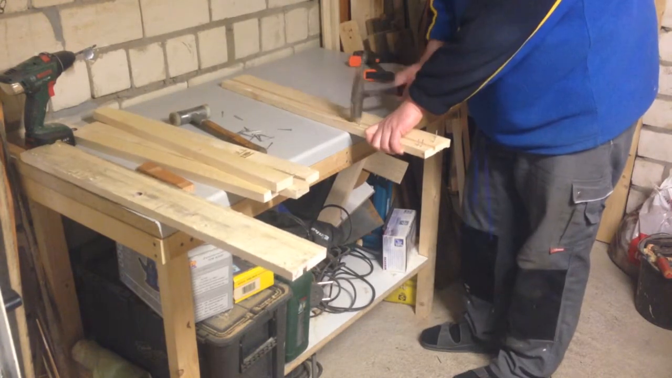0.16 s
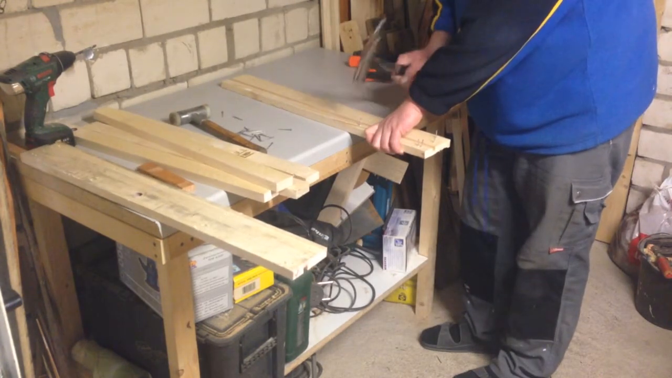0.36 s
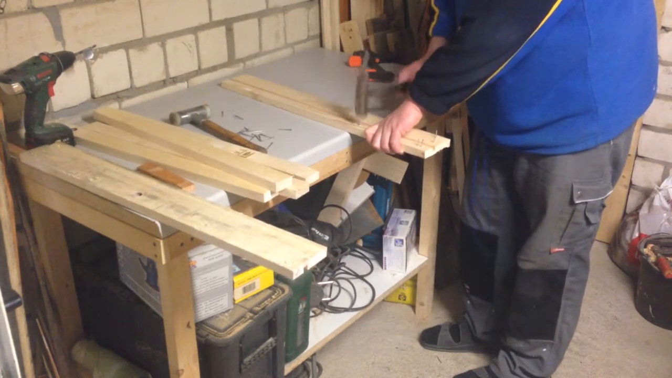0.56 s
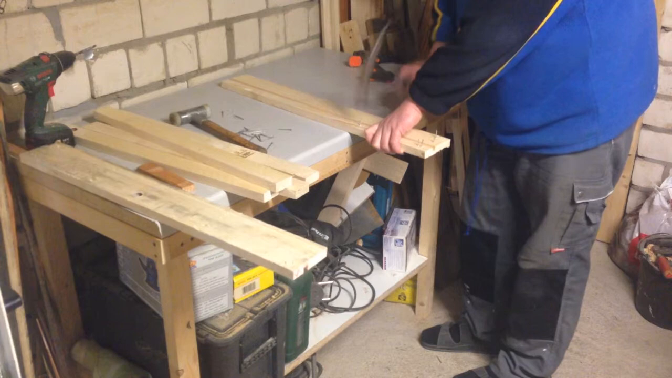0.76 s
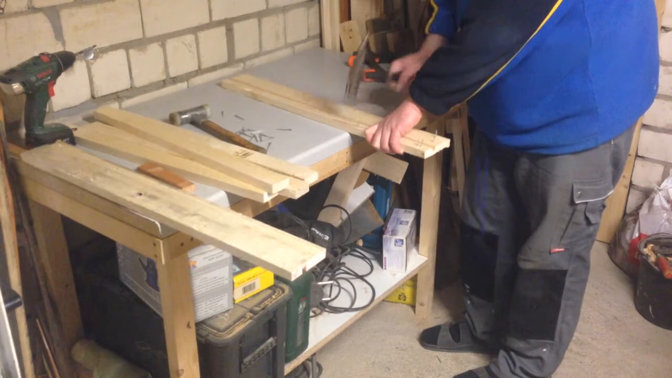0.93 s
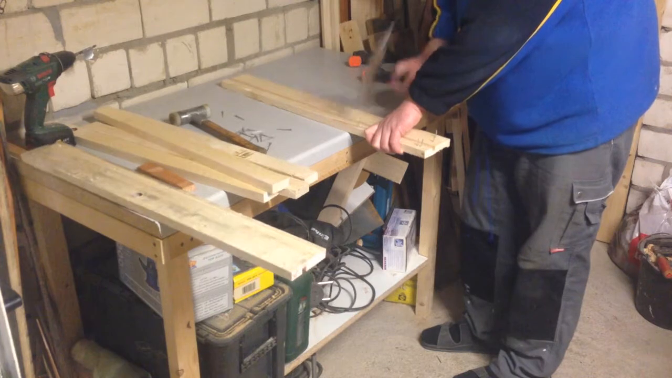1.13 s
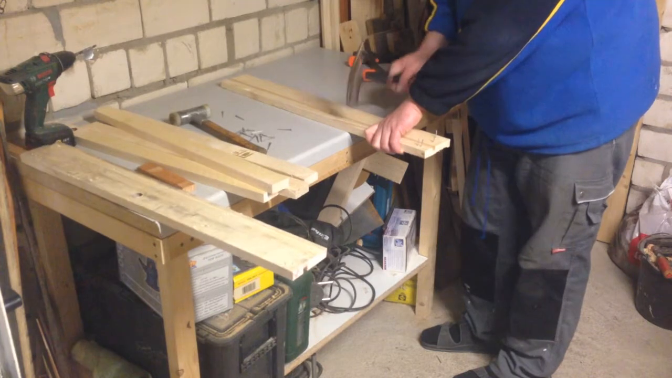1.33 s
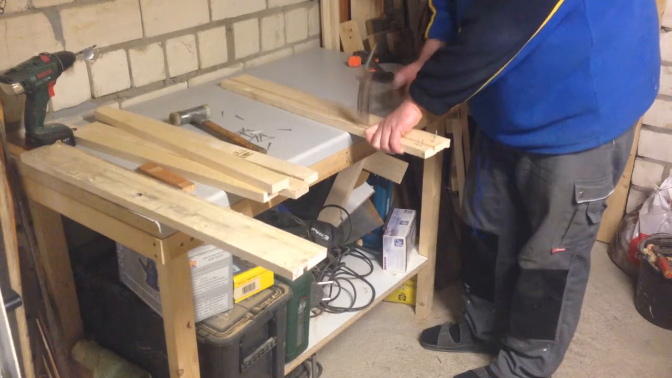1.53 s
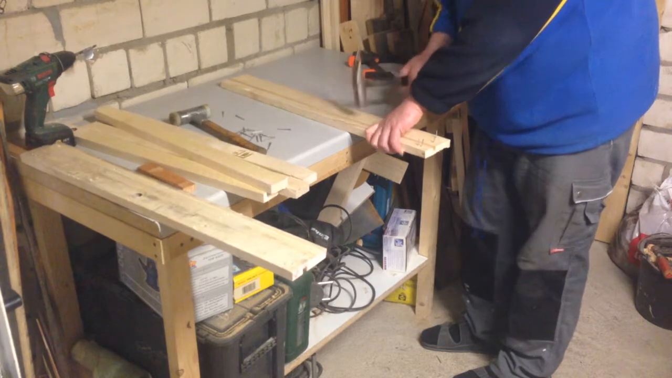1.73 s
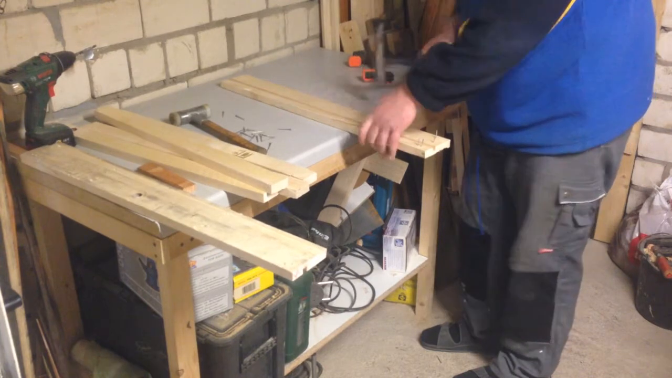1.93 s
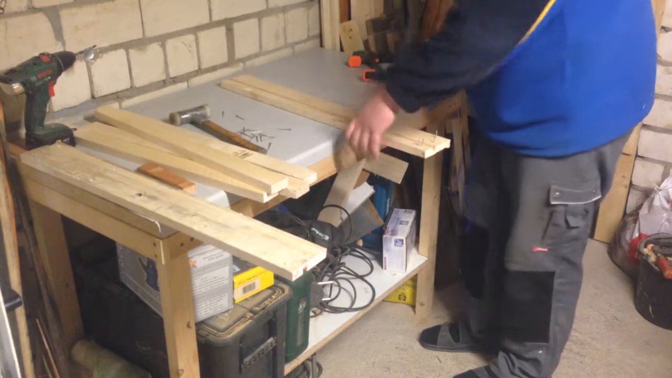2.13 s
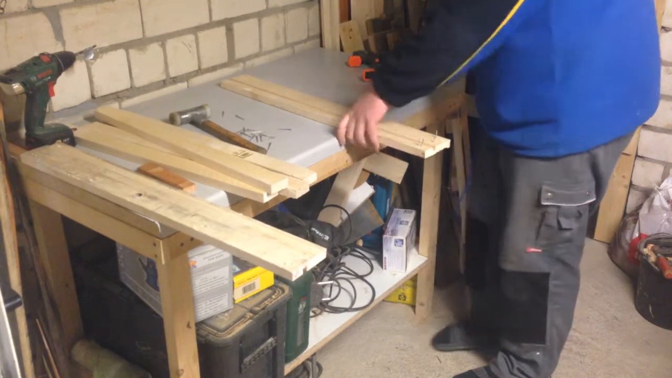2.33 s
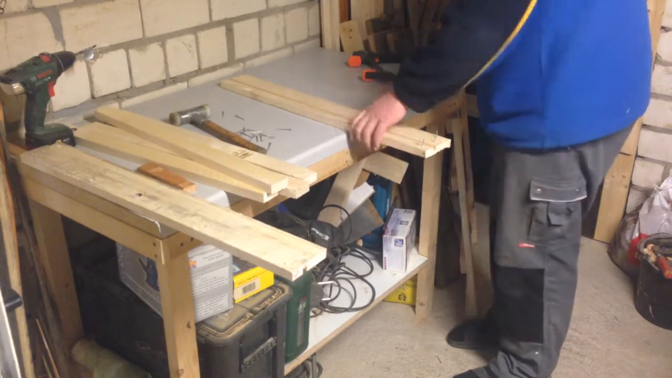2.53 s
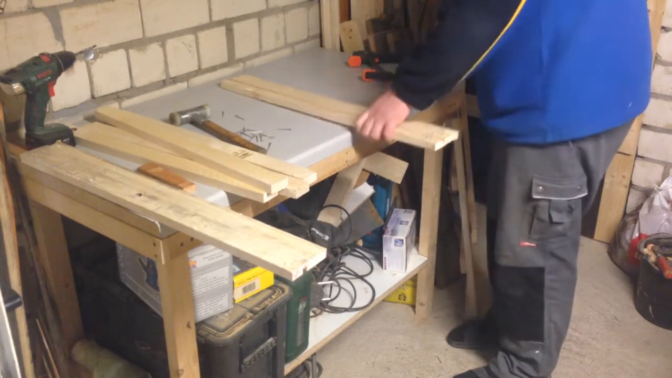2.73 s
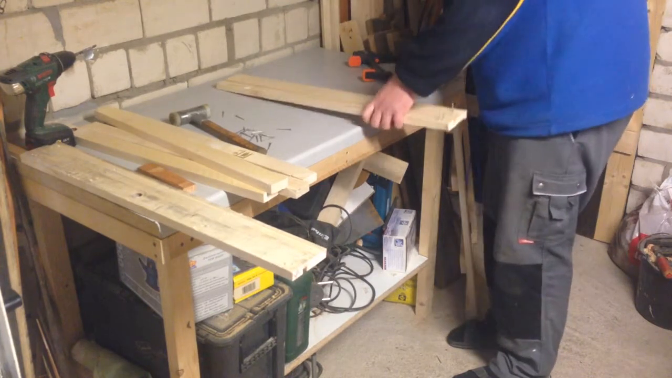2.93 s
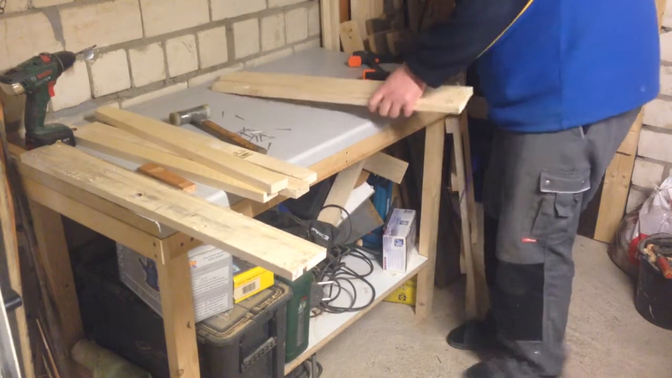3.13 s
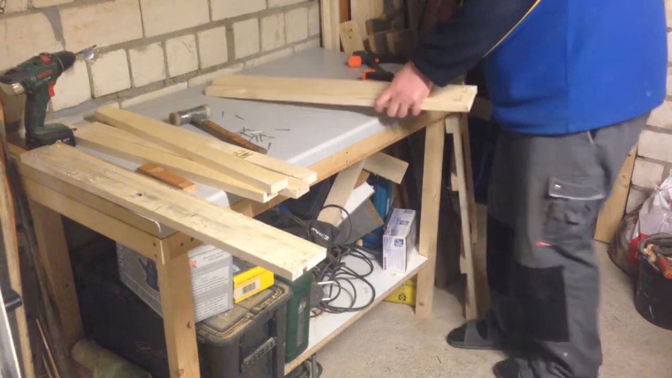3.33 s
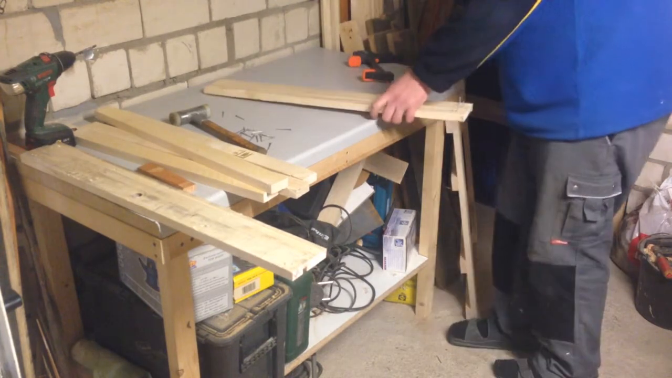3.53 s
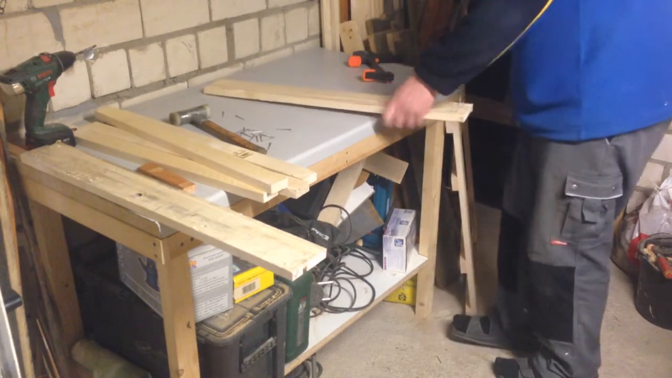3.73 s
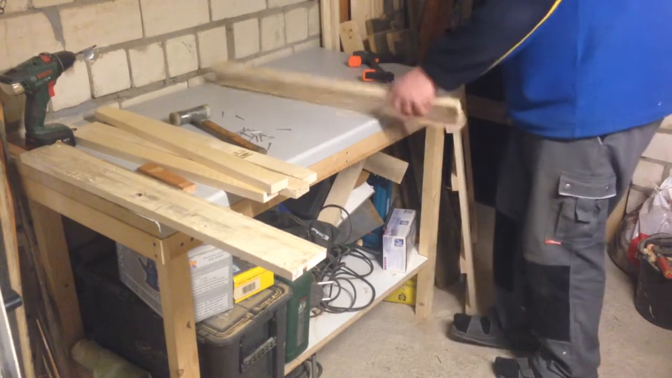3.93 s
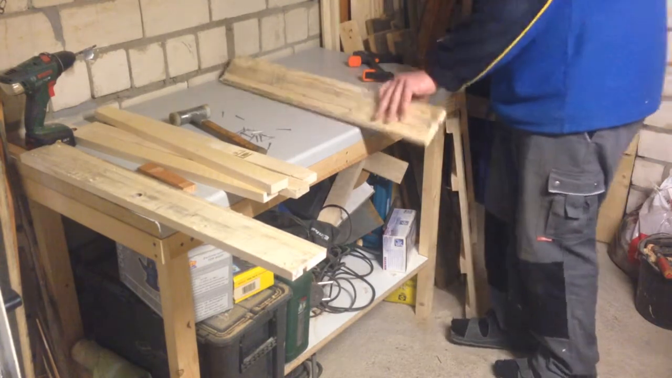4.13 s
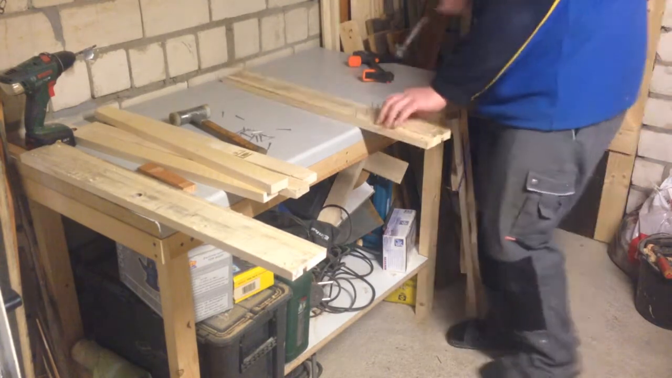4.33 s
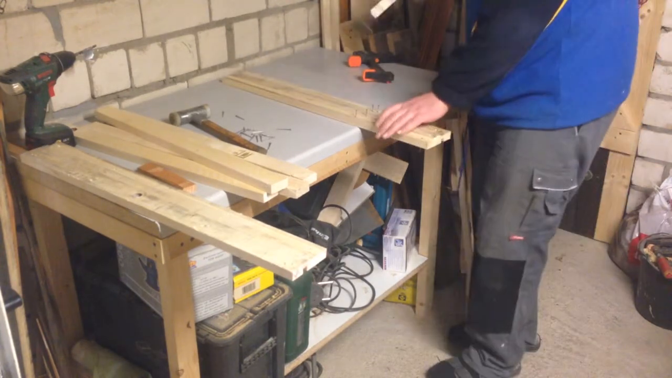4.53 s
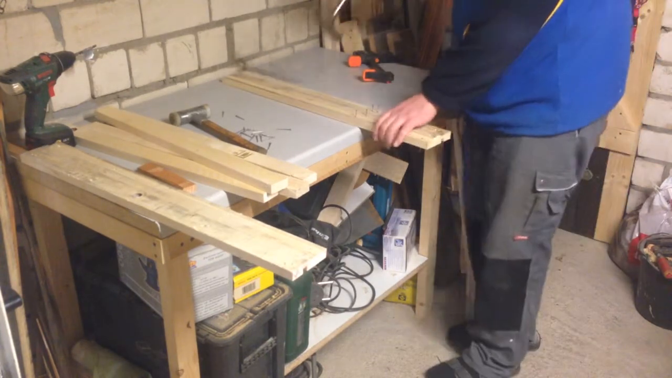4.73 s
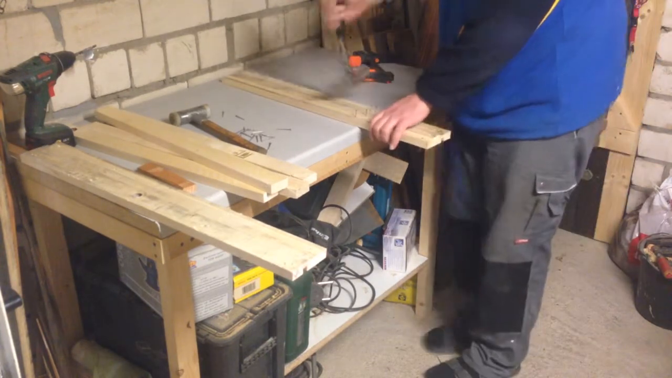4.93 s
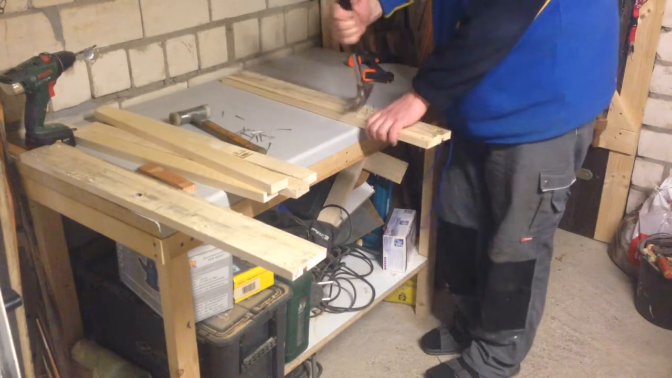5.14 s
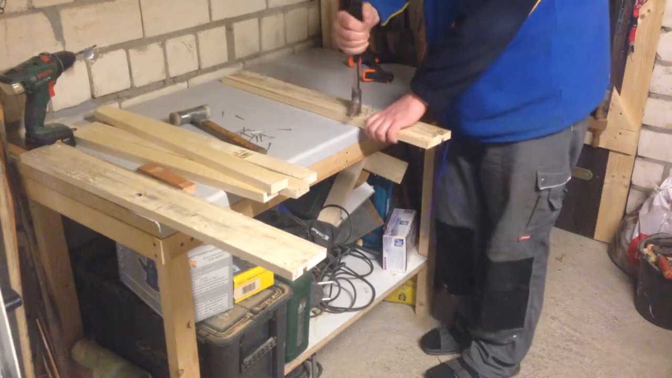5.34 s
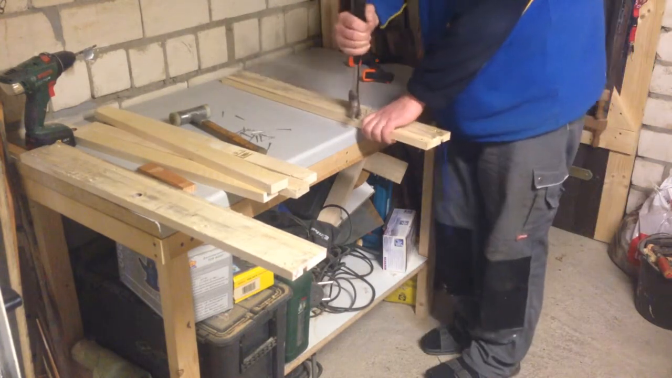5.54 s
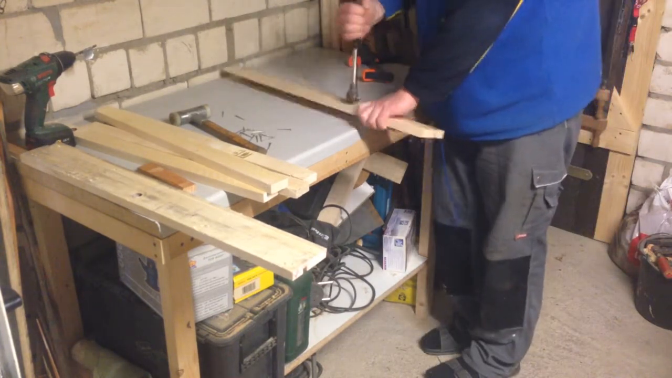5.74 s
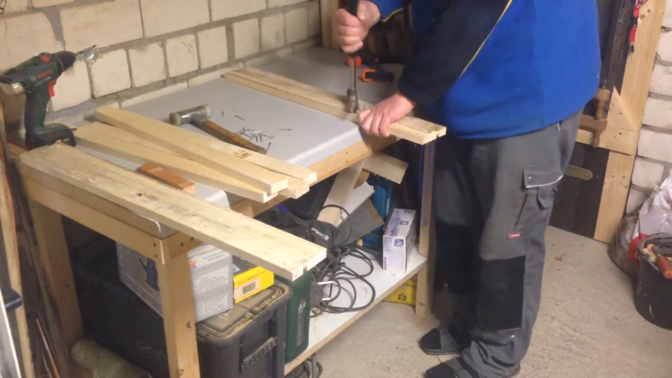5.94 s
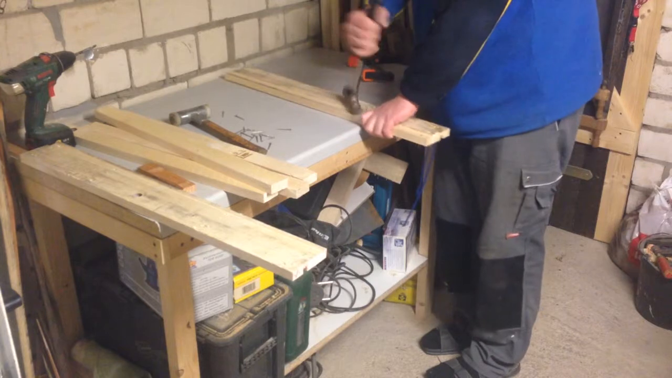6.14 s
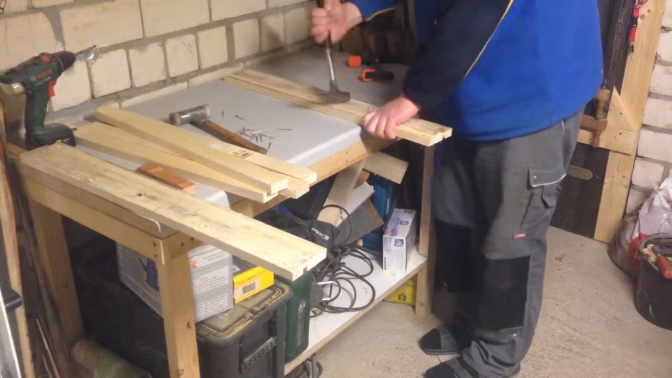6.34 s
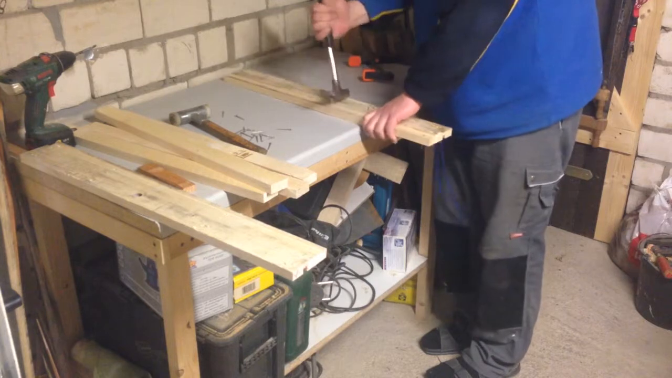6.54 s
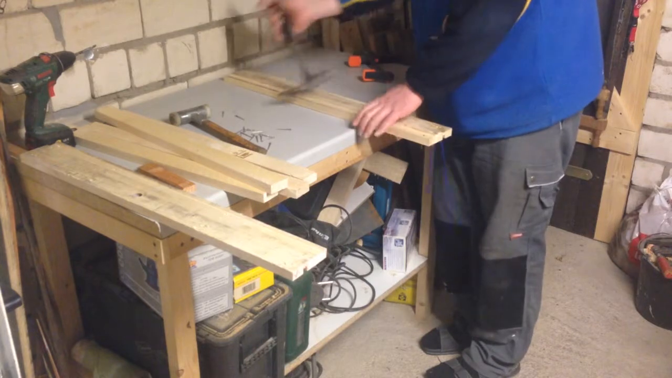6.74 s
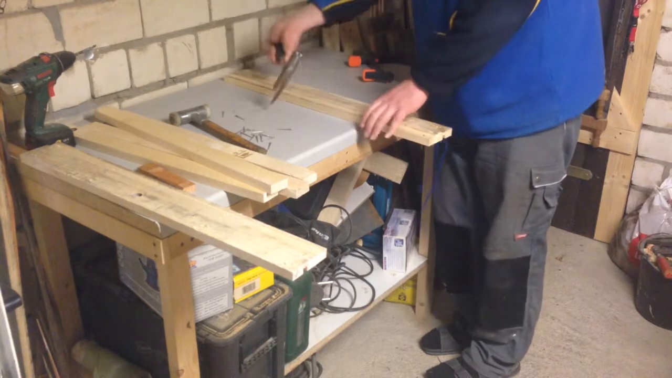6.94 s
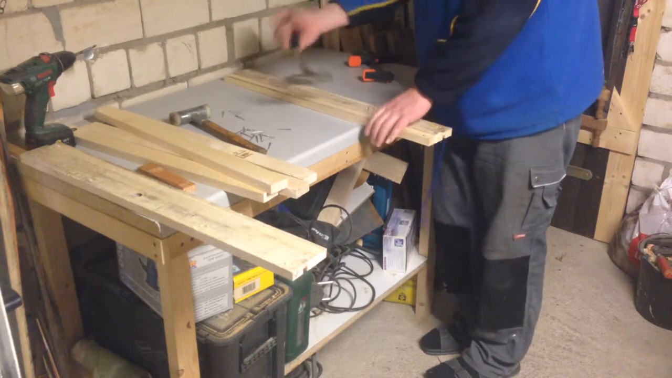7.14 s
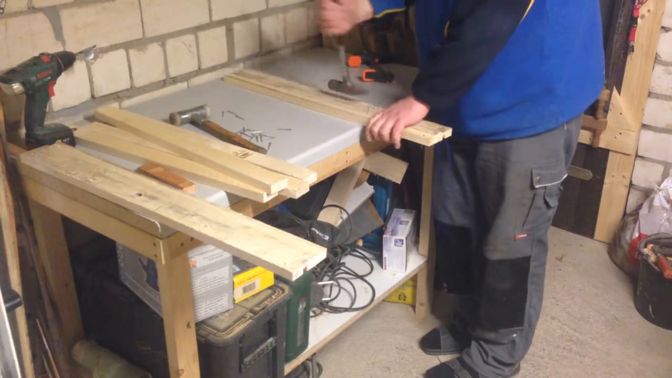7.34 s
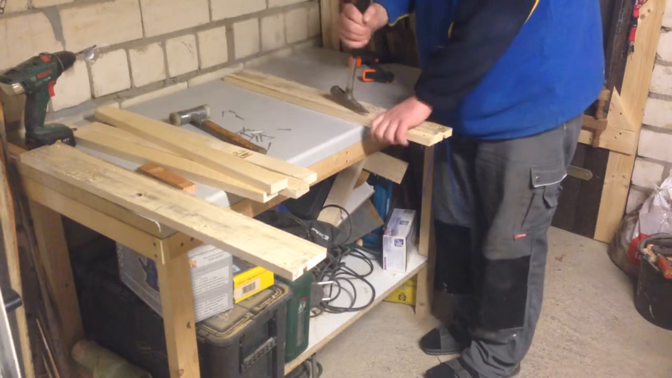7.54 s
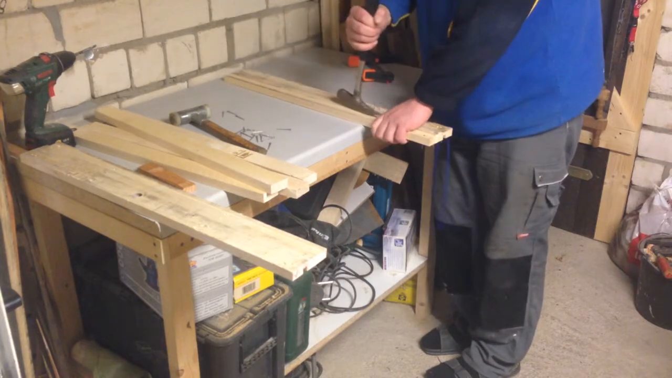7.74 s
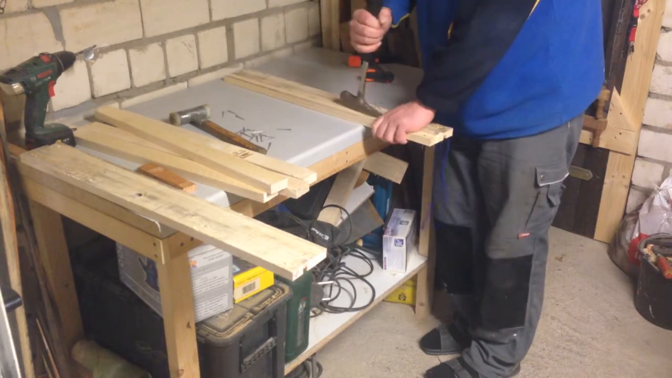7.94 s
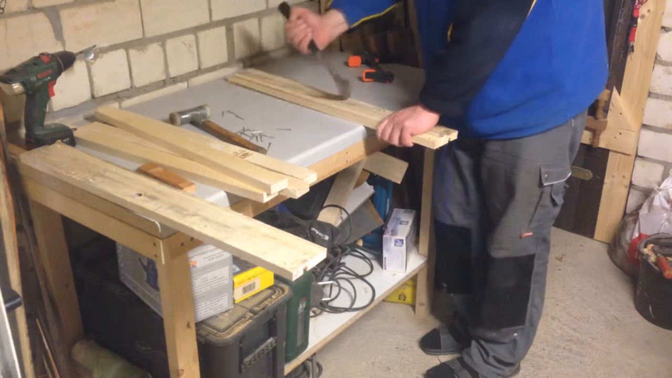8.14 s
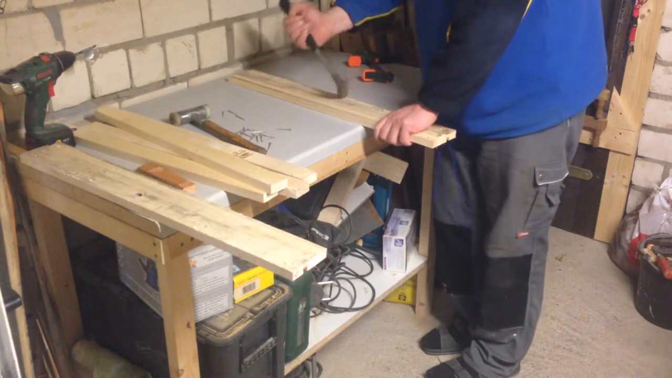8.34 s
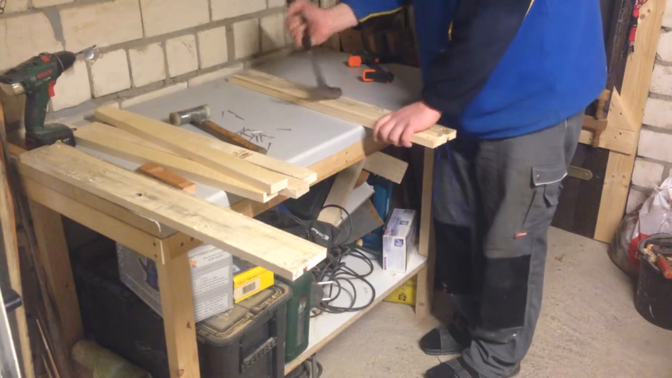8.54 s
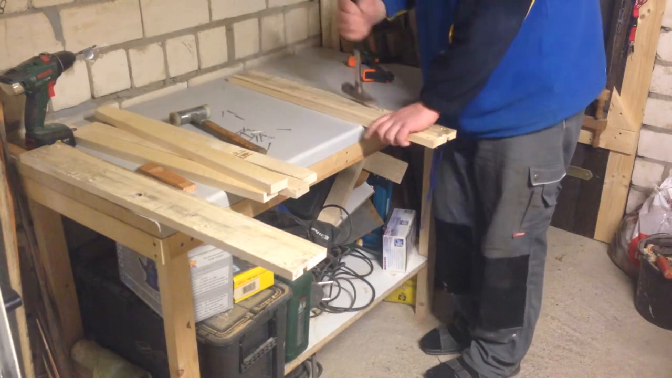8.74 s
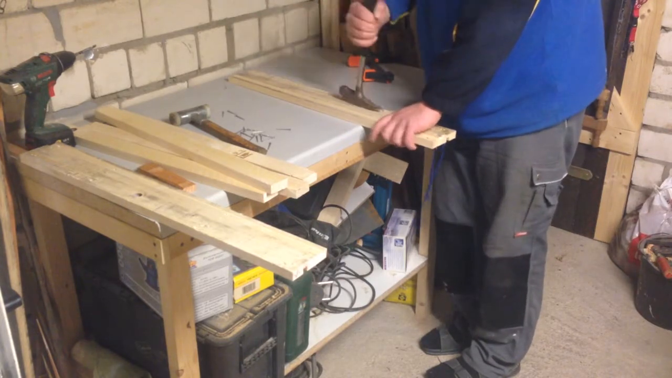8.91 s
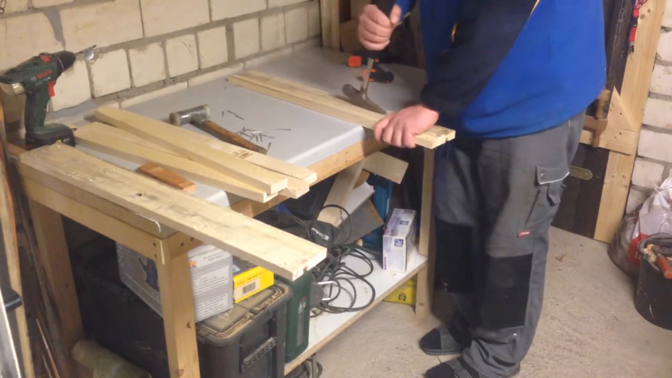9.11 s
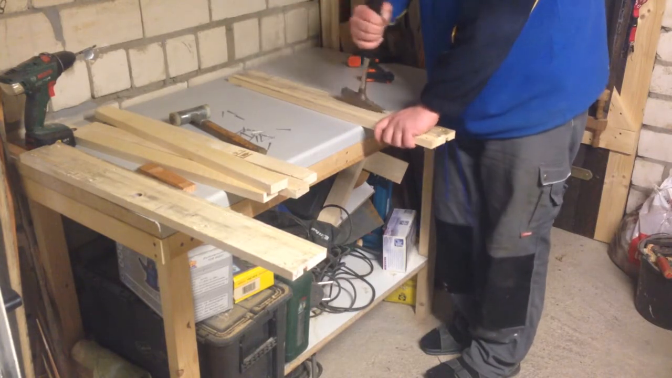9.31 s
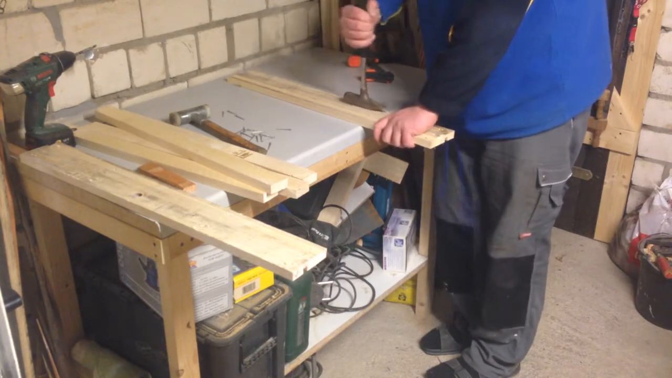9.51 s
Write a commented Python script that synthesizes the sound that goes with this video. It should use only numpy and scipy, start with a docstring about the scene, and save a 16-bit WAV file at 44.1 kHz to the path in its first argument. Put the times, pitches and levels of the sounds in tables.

```python
"""Hammer blows knock nails out of softwood boards on a workbench, each with a slap on the bench and bounces.
Sleeves and shoes then rustle and wood drags; boards are laid, turned and levered, and steel slips and strikes.
Pulled nails skip on the concrete floor, then more boards, steel and nails land before a last rustle and scrape.
Rough noise bursts excite wood modes or nail rings; shaped noise makes cloth, dragging and hiss.
A small brick workshop answers every contact briefly over a faint steady hiss."""
import sys
import numpy as np
from scipy import signal
from scipy.fft import rfft, irfft
from scipy.io import wavfile
from scipy.ndimage import uniform_filter1d

SR = 44100
rng = np.random.default_rng(int(sys.argv[2]) if len(sys.argv) > 2 else 0)


def decibels_to_gain(level_db):
    """Convert a level in decibels to a linear amplitude gain (20 dB per decade)."""
    exponent = np.asarray(level_db, float) / 20
    return 10 ** exponent


def wav_out(sig):
    """Save sig, one row per channel (or a flat mono array), as 16-bit PCM at SR to the path in sys.argv[1]."""
    wavfile.write(sys.argv[1], SR, np.round(np.clip(np.atleast_2d(sig).T, -1, 1) * 32767).astype(np.int16))


N = 422037  # samples in the scene
SPAN = 2 ** 15  # samples of one contact with its tail
LEAD = SR // 32  # samples of swell ahead of a contact
HZ = np.fft.rfftfreq(SPAN, 1 / SR)
T = np.arange(SPAN) / SR

# In the contact tables thud, body, edge and crack are tone settings from low to high; levels are before the mix.
# hammer blows on the nails: start_s, level_db, crack_db, ring_hz (loudest), slap_drop_db (below the blow)
HAMMER_BLOWS = [(-.13, -8.5, -16, 1520, 8.5), (.227, -3, -13.5, 2370, 3.5), (.658, -3.5, -18, 2400, 16.5),
                (.941, -0.7, -18.5, 1370, 3.5), (1.327, -3.5, -19, 2440, 4.5), (1.695, -3, -22, 500, 6)]
# tone of a blow: thud_db (bench), body_db (board), edge_db, chatter_s
BLOW_TONE = (-16, -12, -13.5, 0.1822)
# tone of the struck board slapping the bench: thud_db, body_db, edge_db, chatter_s
SLAP_TONE = (-13.5, -6, -17.5, 0.198)
# the board bouncing after a blow: start_s, level_db, body_db, crack_db, ring_hz
BOARD_BOUNCES = [(-.03, -10, -7.5, -34.5, 1470), (.323, -9, -18.5, -33.5, 1490),
                 (.367, -17.5, -14, -37.5, 1465), (0.435, -27, -7.5, -26, 2150),
                 (.509, -35, -1, -33.5, 2111), (.744, -20, -4.5, -27.5, 1536),
                 (0.815, -32, -7, -32.5, 1440), (1.031, -8.5, -6.5, -30, 2090),
                 (1.084, -20.5, -19, -25.5, 1470), (1.169, -30, -4.5, -25.5, 1470),
                 (1.409, -13.5, -7.5, -37, 1490), (1.485, -28, -14.5, -41.5, 2090),
                 (1.529, -28.5, -11, -32, 2220), (1.749, -13.5, -7, -24, 1295),
                 (1.789, -16.5, -11.5, -22, 1380), (1.859, -32, -9, -22, 704)]
# boards laid, turned and levered on the bench: start_s, level_db, thud_db, crack_db, ring_hz, chatter_s
BOARD_KNOCKS = [(3.6, -33.5, 0, -27.5, 940, .21), (3.623, -21, -8, -33, 870, .27),
                (3.79, -29, -4.5, -40.5, 1113, .29), (4.013, -28.5, -19, -18, 1150, .15),
                (4.022, -22, -24.5, -39, 1450, .05), (4.137, -22.5, 1.5, -46.5, 985, .08),
                (4.31, -11, -13.5, -44.5, 998, .28), (4.342, -10.5, -20.5, -43.5, 923, .15),
                (4.369, -21, -12.5, -40.5, 923, .05), (4.497, -5, -13, -36.5, 1440, .08),
                (5.435, -25, 0.7, -37.5, 533, .15), (5.46, -28, -7.5, -33.5, 1495, .15),
                (5.586, -26.5, -15.5, -27, 770, .15), (6.019, -42.5, -2, -24.5, 739, .18),
                (7.684, -31, 2.5, -30, 713, .09), (7.709, -26.5, -8, -40, 1460, .15),
                (8.333, -5, -10, -30.5, 850, .15), (8.599, -22, -7, -26, 724, .15),
                (8.954, -10, -11, -31, 1200, .17), (9.196, -46, -1, -19, 739, .14)]
# steel head and claw catching, slipping and striking: start_s, level_db, thud_db, crack_db, ring_hz, edge_db
STEEL_HITS = [(2.687, -54.5, 1, -6, 899, -4), (2.809, -50, -16, -18, 1455, -11),
              (5.545, -36, -8.5, -29.5, 3300, -5), (5.818, -5, -11.5, -24.5, 2700, -6),
              (6.325, -1.4, -10, -19, 2202, -12.5), (6.569, -45, -10, -12, 1490, -12),
              (7.797, -35.5, -11, -20, 4600, -16.5), (7.938, -36.5, -1.5, -31, 3470, -9),
              (8.237, -8.5, -7, -11, 1487, -13), (8.523, -21.5, -40, -32.5, 2690, -9.5),
              (9.469, -43, -5.5, -17, 3900, -4), (9.553, -29.5, -2.5, -11.5, 803.6, -10)]
# brightness of a hard face, added to every contact on wood: pitch_hz, gain_db
HARD_FACE = [(1900, -1), (3200, 10), (7000, 11.5)]
# modes of bench top and boards before damping: pitch_hz, width_hz, level_db (over the dense background)
WOOD_MODES = [(86, 4.6, 13.5), (132, 15, 8), (175.84, 12, 17), (280, 8.3, 10), (400, 55, 4.5),
              (523, 21, 7.5), (647, 82, 5.5), (802, 34, 6), (908, 6.7, 3.5), (1090, 25, -8), (1481, 57, 6),
              (1785, 8.3, -16), (1870, 8.5, -5.5), (2175, 160, 5), (2450, 49, 5), (2736, 67, 3),
              (3210, 35, 1.5), (4440, 150, 3), (5350, 110, 4.5)]
# dense background of wood modes: pitch_hz, gain_db
PLANK_TONE = [(30, -9), (60, 7.5), (250, 5), (1000, -4.5), (2500, -11), (4000, -10.5), (8000, -17.5),
              (15000, -30)]
# nails hitting the floor: start_s, level_db, ring_hz
NAIL_HITS = [(6.999, -52.5, 9310), (7.063, -24, 4950), (7.0938, -30.5, 3440), (7.1425, -32.5, 5420),
             (7.196, -41.5, 2110), (7.2261, -29.5, 2340), (7.2778, -36, 6100), (7.32, -41.5, 2090),
             (7.3524, -45, 2280), (7.3744, -51.5, 2260), (8.5844, -18, 5340), (8.6292, -49, 2090),
             (8.6886, -25, 2100), (8.772, -32, 5000), (8.8095, -40.5, 4900)]
# click of a nail on concrete: pitch_hz, gain_db
NAIL_CLICK = [(290, -84), (500, -21.5), (1600, -6.5), (2010, -8.5), (2230, -4.5), (2800, -9), (3480, -4),
              (15500, -19.5)]
# brushes of sleeves, shoes and hands: peak_s, level_db, rise_ms (per 20 dB), fall_ms (per 20 dB)
RUSTLES = [(2.422, -58.5, 18, 57), (2.53, -70, 150, 100), (2.612, -53, 110, 58), (2.694, -66, 21, 50),
           (2.82, -58, 15, 120), (3.048, -64.5, 150, 150), (3.29, -64, 200, 300), (3.425, -52.5, 18, 99.5),
           (3.58, -67.5, 200, 30), (4.63, -54, 25, 140), (4.675, -52.5, 101, 68), (4.95, -67.5, 599.5, 600),
           (5.048, -52.5, 6, 45), (5.124, -47, 86, 69), (5.25, -70, 200, 400), (5.586, -50, 110, 61.5),
           (5.78, -67.5, 300, 31.5), (6.05, -66, 302, 201), (6.186, -61.5, 16, 70), (6.3, -63.5, 109, 30),
           (6.576, -58, 16, 42), (6.79, -63, 22.5, 37), (8.82, -53, 21, 170), (9.26, -70.5, 497, 500),
           (9.374, -61, 15, 70), (9.47, -65, 12, 16), (9.542, -61, 45, 30)]
# tone of the cloth: pitch_hz, relative_db
CLOTH_TONE = [(880, -40.5), (1500, -7), (2940, -1), (4750, 0.5), (12500, -11), (15500, -18)]
# wood pressed and dragged on the bench: peak_s, rumble_db, scrape_db, rise_ms (per 20 dB), fall_ms (per 20 dB)
DRAGS = [(2.61, -74, -70, 40, 90), (2.705, -60, -62.5, 30, 50), (2.864, -54, -56.5, 37, 100),
         (3.2, -84.5, -68, 500, 502), (3.15, -80, -66, 30, 30), (3.474, -57.5, -59.5, 73, 99.5),
         (3.58, -63, -64.5, 21, 21), (3.912, -48, -73.5, 21.5, 301), (3.985, -43.5, -56, 122, 21.5),
         (5.062, -56.5, -65, 40, 160), (5.135, -60.5, -60, 120, 250.5), (5.3, -66.5, -69, 300.5, 250.5),
         (5.5, -39, -46.5, 12, 49), (5.591, -36, -31.5, 39.5, 16), (5.635, -45, -58.5, 80.5, 16),
         (5.77, -50.5, -69, 51, 49.5), (5.803, -31.5, -45.5, 20, 8), (6.11, -45.5, -52.5, 80.5, 201),
         (6.178, -41.5, -60.5, 152, 15), (6.27, -48.5, -51, 20.5, 50.5), (6.312, -35, -39.5, 25.5, 9),
         (6.645, -55, -78, 40, 30), (8.05, -50.5, -72, 42, 72), (8.212, -47.5, -48, 14, 13),
         (9.1, -56.5, -53, 21, 100), (9.193, -40.5, -52, 17, 53), (9.48, -58.5, -62, 200, 100),
         (9.545, -48, -44.5, 27, 10)]
# reverberation of the small room: pitch_hz, t60_s
ROOM_DECAY = [(80, 0.53), (300, 0.28), (1000, 0.23), (4000, 0.21), (12000, 0.21)]
# tone of the hiss: pitch_hz, relative_db
HISS_TONE = [(15, -34.5), (25, -7), (64, 3.5), (301, -4), (856, -14.5), (1540, -9), (1810, -14.5),
             (4040, -15), (15000, -19)]


def unit(x):
    """Scale to rms 1."""
    return x / np.sqrt(np.mean(x ** 2) + 1e-20)


def along(points, hz):
    """Read a curve of (Hz, value) points on a log frequency axis."""
    point_hz, value = np.transpose(points)
    return np.interp(np.log(hz + 1), np.log(point_hz + 1), value)


def causal(gain):
    """Minimum-phase response: the given gain with its energy as early as possible."""
    cepstrum = irfft(np.log(gain + 1e-6))
    cepstrum[1:SPAN // 2] *= 2
    cepstrum[SPAN // 2 + 1:] = 0
    return np.exp(rfft(cepstrum))


def peak(hz, centre_hz, width_hz):
    """Gain of one damped resonance, 1 at its centre."""
    return hz * width_hz / np.hypot(centre_hz ** 2 - hz ** 2, hz * width_hz)


def contacts():
    """List contacts on wood: start_s, level_db, thud_db, body_db, edge_db, chatter_s, crack_db, ring_hz, damping."""
    blows = [(s, db, *BLOW_TONE, crack, hz) for s, db, crack, hz, _ in HAMMER_BLOWS]
    # the struck board meets the bench 9.9 ms later, with 5 dB less crack
    slaps = [(s + .0099, db - drop, *SLAP_TONE, crack - 5, 540)
             for s, db, crack, _, drop in HAMMER_BLOWS]
    # weak bounces are mostly thud
    bounces = [(s, db, -22 - 0.66 * db, body, -15, .16, crack, hz)
               for s, db, body, crack, hz in BOARD_BOUNCES]
    # a knock that shakes the bench also fills the board
    boards = [(s, db, thud, -0.5 + .65 * thud, -22.5, chatter, crack, hz)
              for s, db, thud, crack, hz, chatter in BOARD_KNOCKS]
    steel = [(s, db, thud, -10.5 + .45 * thud, edge, .16, crack, hz)
             for s, db, thud, crack, hz, edge in STEEL_HITS]
    # factors on mode width: wood left free, and wood the worker leans on
    free_damping, leaned_damping = 0.95, 2.7
    free = [(*row, free_damping) for row in blows + slaps + bounces]
    leaned = [(*row, leaned_damping) for row in boards + steel]
    return free + leaned


def knocks():
    """A faint swell, a sharp contact, then loose wood chattering in duller taps that soon settle."""
    out = np.zeros(N + 2 * SR)
    soft = causal(1 / np.hypot(1, HZ / 2500))
    since = T - LEAD / SR  # seconds from the contact
    for s, db, thud_db, body_db, edge_db, chatter_s, crack_db, ring_hz, damping in contacts():
        tap_here = rng.random(SPAN) < 900 / SR  # about 900 taps a second
        settling = decibels_to_gain(-60 * (np.abs(since) / max(chatter_s, .01)) ** 1.1)
        taps = decibels_to_gain(-9) * tap_here * settling
        swell = decibels_to_gain(-32.5 + 2500 * np.minimum(since, 0))
        loose = rng.standard_normal(SPAN) * np.where(since > 0, taps, swell)
        # a dull contact lasts longer
        force = contact(t60=.012 - 0.00027 * crack_db) + soft * rfft(loose)
        colour = [(180, thud_db), (520, body_db), (1100, 0), (1900, 0.0042), (3200, edge_db), (7000, crack_db)]
        # a dull contact leaves one ring standing out, more so when it is light
        ring_db = 0.83 - 0.16 * crack_db - 0.19 * db
        favoured = np.hypot(1, decibels_to_gain(ring_db) * peak(HZ, ring_hz, 0.04 * ring_hz))
        tone = decibels_to_gain(along(colour, HZ) + along(HARD_FACE, HZ))
        gain = tone * favoured * wood(HZ, spread_db=1.5, damping=damping)
        # the level over the first moments lies below the peak
        add(out, s, db - 7.0, force, gain, wet_db=-2.5, above_hz=660)
    return out[SR:SR + N]


def contact(t60):
    """Spectrum of a rough contact: a short burst after the lead, evened to power 1 across frequency."""
    shape = (1 - np.exp(-T / 0.0018)) * decibels_to_gain(-60 * T / t60)
    burst = rfft(np.roll(rng.standard_normal(SPAN) * shape, LEAD))
    return burst / np.sqrt(uniform_filter1d(np.abs(burst) ** 2, size=150))


def wood(hz, spread_db, damping=1):
    """Gain of bench and boards: each contact weights the modes anew; higher damping widens and lowers them."""
    frame_hz = 110  # the bench legs ring up to here, untouched by damping
    power = 1
    for centre_hz, width_hz, mode_db in WOOD_MODES:
        wider = damping if centre_hz > frame_hz else 1
        weight = decibels_to_gain(mode_db + spread_db * rng.standard_normal())
        power = power + (weight * peak(hz, centre_hz, width_hz * wider)) ** 2 / wider
    return np.sqrt(power) * decibels_to_gain(along(PLANK_TONE, hz))


def add(out, s, db, force, gain, wet_db, above_hz):
    """Place one contact in the room, setting its first moments above a frequency to the given rms level."""
    wave = irfft(force * causal(gain) * room(wet_db))
    upper = irfft(rfft(wave) * (HZ > above_hz))
    first_moments = upper[LEAD:LEAD + SR // 80]
    out[SR + round(s * SR) - LEAD:][:SPAN] += decibels_to_gain(db) * wave / np.sqrt(np.mean(first_moments ** 2))


def nails():
    """Each bounce on concrete is a bright click with a brief ring of the shank."""
    out = np.zeros(N + 2 * SR)
    for s, db, ring_hz in NAIL_HITS:
        ring = np.hypot(1, decibels_to_gain(7) * peak(HZ, ring_hz, 70))
        click = decibels_to_gain(along(NAIL_CLICK, HZ))
        add(out, s, db - 9.5, contact(t60=0.02), ring * click, wet_db=0.0, above_hz=1300)
    return out[SR:SR + N]


def rustling():
    """Cloth rustles broadly: patchy noise under the swells of each brush."""
    cloth = noise(lambda hz: decibels_to_gain(along(CLOTH_TONE, hz)), patchy_db=1.8)
    return level(RUSTLES, quickest_ms=12) * cloth


def dragging():
    """Dragged wood hums in the low modes of the bench and scrapes in those of the board."""
    hum = lambda hz: wood(hz, spread_db=1.5) * peak(hz, 180, 90)
    scrape = lambda hz: wood(hz, spread_db=0) * peak(hz, 1500, 1600)
    strokes = np.array(DRAGS)
    rumble_level = level(strokes[:, [0, 1, 3, 4]], quickest_ms=4)
    scrape_level = level(strokes[:, [0, 2, 3, 4]], quickest_ms=4)
    return rumble_level * noise(hum, patchy_db=1) + scrape_level * noise(scrape, patchy_db=2)


def level(strokes, quickest_ms):
    """Summed gain of strokes (s, dB, rise ms, fall ms) that swell and fade evenly in dB."""
    ms = 1000 * np.arange(N) / SR
    gain = np.zeros(N)
    for s, db, rise_ms, fall_ms in strokes:
        at = 1000 * s
        rising = (at - ms) / max(rise_ms, quickest_ms)
        falling = (ms - at) / max(fall_ms, quickest_ms)
        gain += decibels_to_gain(db - 20 * np.where(ms < at, rising, falling))
    return uniform_filter1d(gain, size=300)


def noise(gain, patchy_db):
    """Noise of rms 1 with a given gain over frequency and random patches in time and frequency."""
    hz, _, z = signal.stft(rng.standard_normal(N), SR, nperseg=2048)
    across_hz = uniform_filter1d(rng.standard_normal(z.shape), size=20, axis=0)
    patches = decibels_to_gain(patchy_db * unit(uniform_filter1d(across_hz, size=3, axis=1)))
    shaped = z * gain(hz)[:, None] * patches
    return unit(signal.istft(shaped, SR, nperseg=2048)[1][:N])


def room(wet_db):
    """Direct sound plus a fresh reverberant tail, each frequency dying at its own speed."""
    bass_hz = 294  # below this the small room adds little tail
    hz, t, z = signal.stft(rng.standard_normal(SPAN // 2), SR, nperseg=256)
    decay = decibels_to_gain(-60 * t / along(ROOM_DECAY, hz)[:, None])
    tail = signal.istft(z * decay, SR, nperseg=256)[1]
    tail *= 1 - np.exp(-(T[:len(tail)] / 0.0028) ** 2)  # first walls arrive after a few ms
    thinned = HZ / np.hypot(HZ, bass_hz)
    return 1 + decibels_to_gain(wet_db) * thinned * rfft(tail / np.linalg.norm(tail), SPAN)


def hiss():
    """Hiss of room and microphone: faint shaped noise running throughout."""
    return decibels_to_gain(-63.5) * noise(lambda hz: decibels_to_gain(along(HISS_TONE, hz)), patchy_db=.6)


def scene():
    """Mix contacts on wood, nails, rustling and dragging over the hiss, as one channel."""
    return (knocks() + nails() + rustling() + dragging() + hiss())[None]


def roll_off(x):
    """The treble ends steeply here."""
    return signal.sosfilt(signal.butter(12, 16460, fs=SR, output="sos"), x)


def record(dry):
    """Gain control ducks a little after loud passages; the input dulls the top and the hardest blows clip."""
    keep = np.exp(-1 / (.6 * SR))  # the gain control listens over 0.6 s
    heard_power = signal.lfilter([1 - keep], [1, -keep], dry ** 2)
    heard_db = 10 * np.log10(heard_power + 1e-12)
    ducked = dry * decibels_to_gain(-.3 * np.maximum(heard_db + 29.5, 0))  # 0.3 dB down per dB over -29.5 dB
    hz = np.fft.rfftfreq(N, 1 / SR)
    dulled = irfft(rfft(ducked) / np.hypot(1, (hz / 15200) ** 60), N)
    clipped = dulled / (1 + np.abs(dulled) ** 10) ** (1 / 10)
    return roll_off(clipped)


dry = scene()
out = record(dry)
wav_out(out)
```